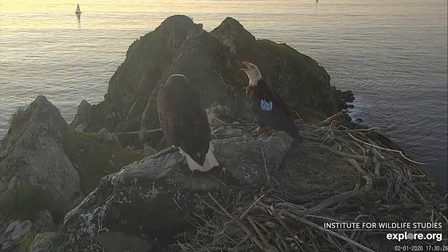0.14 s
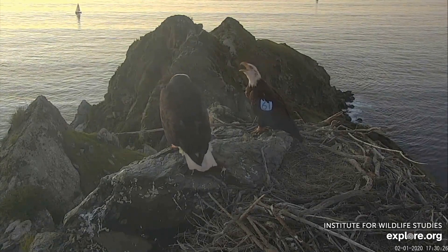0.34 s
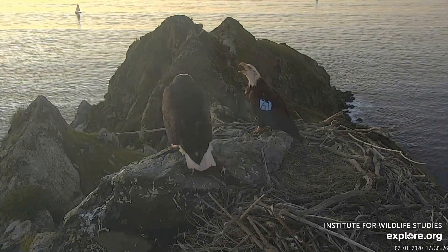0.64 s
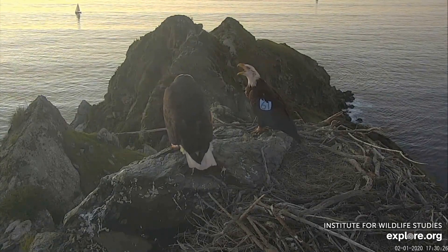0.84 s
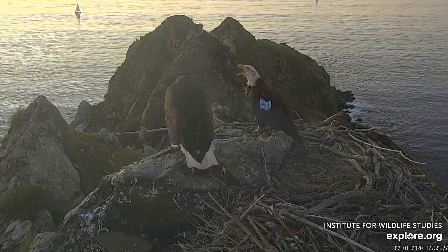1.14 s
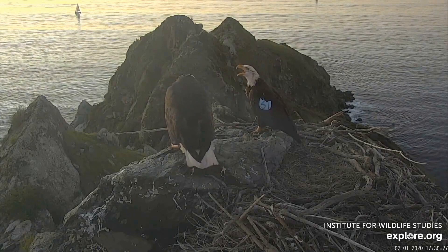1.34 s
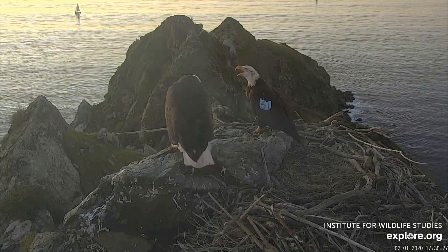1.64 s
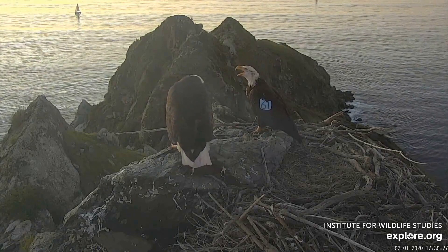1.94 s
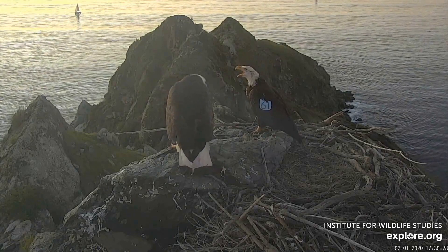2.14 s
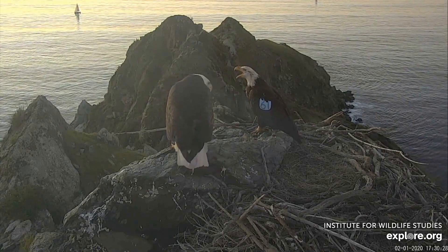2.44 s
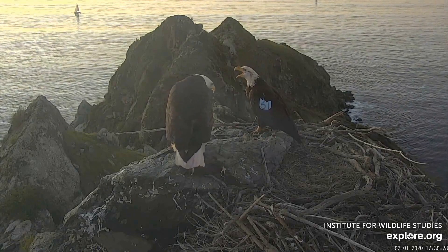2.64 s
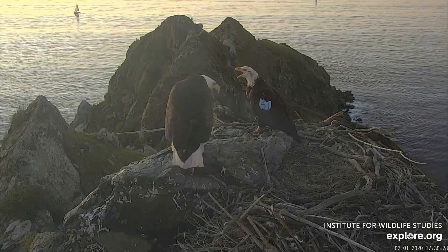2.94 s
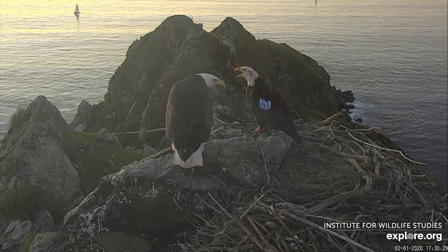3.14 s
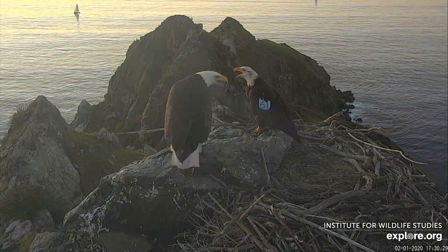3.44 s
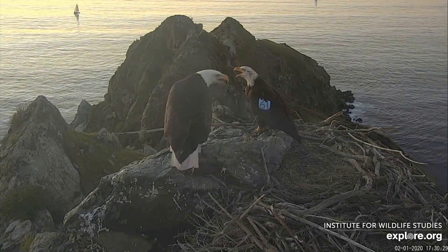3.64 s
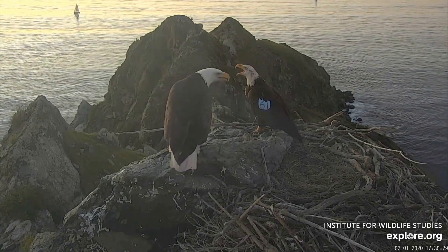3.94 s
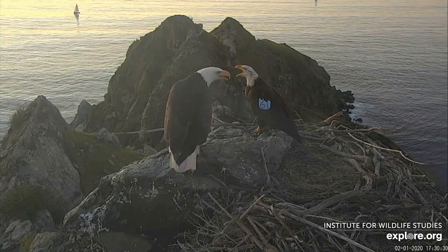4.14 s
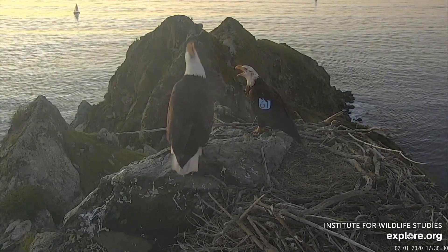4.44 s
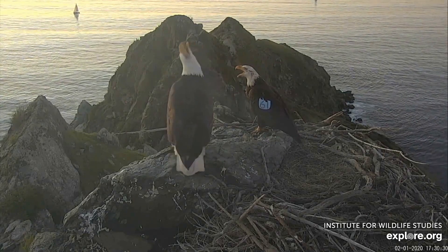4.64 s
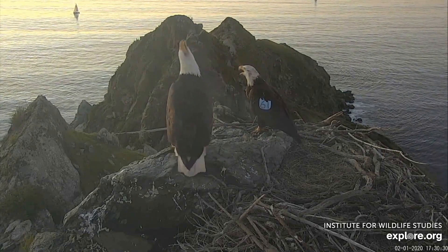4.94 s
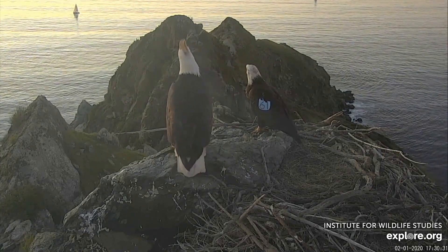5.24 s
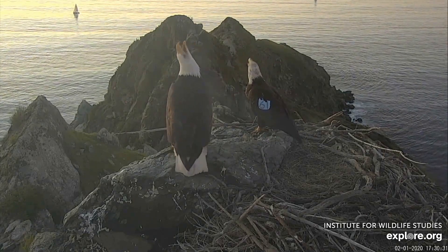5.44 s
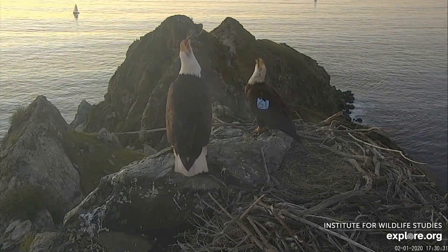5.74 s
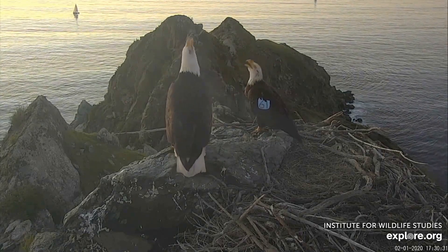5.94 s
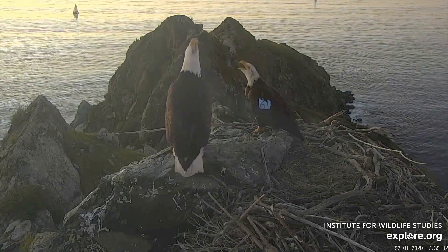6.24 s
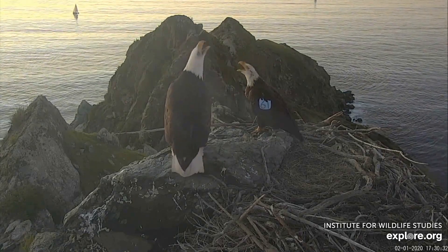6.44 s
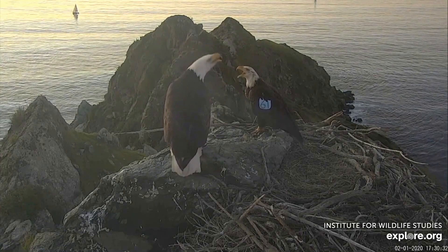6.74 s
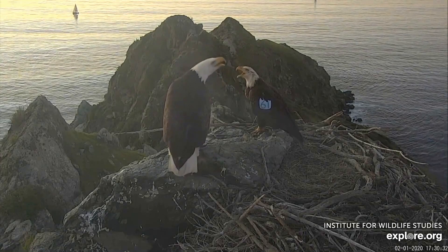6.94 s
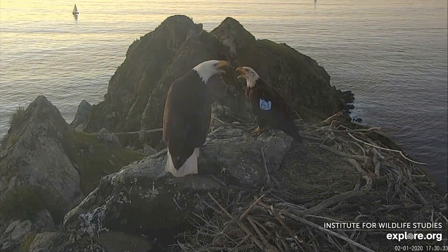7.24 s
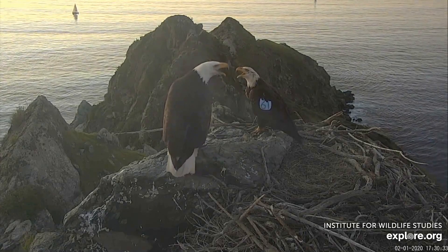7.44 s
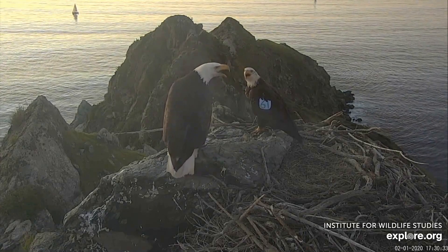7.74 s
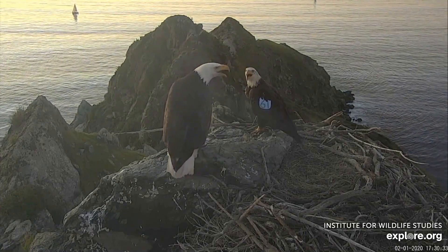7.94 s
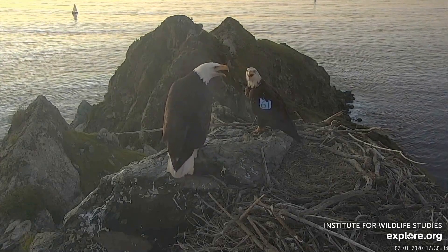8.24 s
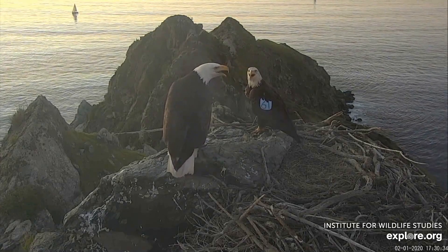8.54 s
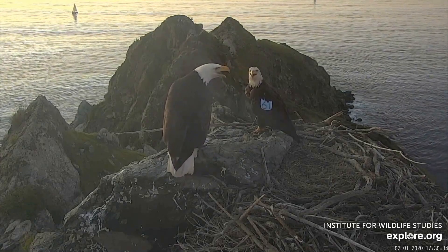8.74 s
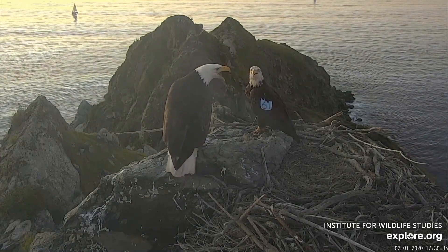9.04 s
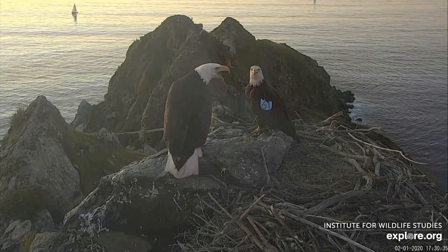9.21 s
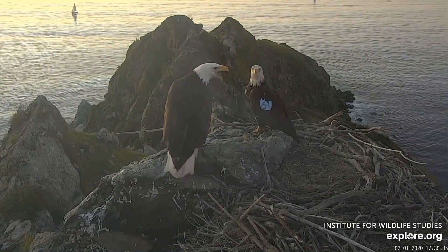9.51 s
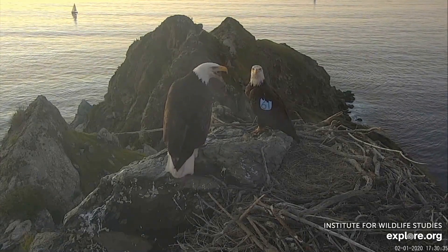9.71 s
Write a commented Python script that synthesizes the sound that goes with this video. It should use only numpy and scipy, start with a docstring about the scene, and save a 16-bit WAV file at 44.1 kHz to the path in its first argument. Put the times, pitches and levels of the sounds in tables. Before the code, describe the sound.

A loud, slightly overloaded eagle duet in the open air by the sea. One bird's very high piping answers the other's lower chitter, about eight notes a second, each a brief pure chirp with a raspy edge. There are small gaps, isolated yelping whistles in the middle, a couple of soft low mews and a nest thump later, then strong calls to the end. Quiet surf wash and wind rumble stay behind, nearly without echo.

```python
"""Two eagles chitter at each other on a cliff-top nest, close to a fixed camera microphone.
Each note is a nearly pure whistle, many led in by a quick falling squeak; the middle register rasps and warbles.
The loud notes overload the input, which adds shrill overtones; birds that overlap make combination tones.
Surf far below is filtered noise, with wind rumbling on the housing, a faint hum, bumps on the nest
and a faint scatter of the calls from the rocks."""
import sys
import numpy as np
from scipy import signal
from scipy.fft import rfft, irfft, next_fast_len
from scipy.io import wavfile
from scipy.ndimage import uniform_filter1d

SR = 44100
rng = np.random.default_rng(int(sys.argv[2]) if len(sys.argv) > 2 else 0)


def wav_out(sig):
    """Save sig, one row per channel (or a flat mono array), as 16-bit PCM at SR to the path in sys.argv[1]."""
    wavfile.write(sys.argv[1], SR, np.round(np.clip(np.atleast_2d(sig).T, -1, 1) * 32767).astype(np.int16))


N = 435266
T = np.arange(N) / SR

# arched chitter notes of both birds: [t/s, length/s, top f/Hz, relative level/dB, attack/s]
CHITTER_NOTES = [(0.04, 0.053, 3770, -20.5, 0.0074), (0.075, 0.035, 2970, -21, 0.0073),
                 (0.155, 0.065, 2933, -14.5, 0.0041), (0.274, 0.054, 2887, -8.5, 0.0084),
                 (0.398, 0.047, 2880, -9, 0.0047), (0.523, 0.044, 2810, -12, 0.0063),
                 (0.646, 0.042, 2755, -15, 0.0055), (0.781, 0.031, 2110, -26.5, 0.004),
                 (0.944, 0.087, 4600, -3.5, 0.0041), (1.09, 0.029, 4590, -5.5, 0.0054),
                 (1.15, 0.072, 4650, -7.5, 0.026), (1.244, 0.11, 2954, -8.5, 0.0084),
                 (1.252, 0.048, 3770, -12.5, 0.024), (1.286, 0.032, 4650, 0, 0.024),
                 (1.369, 0.055, 2868, -9, 0.0017), (1.37, 0.059, 3606, -4.5, 0.017),
                 (1.484, 0.052, 2830, -7.5, 0.0025), (1.485, 0.056, 3490, -8, 0.0053),
                 (1.585, 0.052, 2850, -3.5, 0.019), (1.694, 0.042, 2750, -14.5, 0.007),
                 (2.203, 0.083, 2917, -4, 0.011), (2.33, 0.051, 2914, -8.5, 0.0049),
                 (2.416, 0.091, 4520, -10, 0.023), (2.44, 0.054, 2855, -8.5, 0.0038),
                 (2.551, 0.053, 2807, -5.5, 0.017), (2.566, 0.037, 4560, -9, 0.007),
                 (2.629, 0.08, 4705, -11.5, 0.0093), (2.665, 0.046, 2786, -4.5, 0.012),
                 (2.744, 0.017, 3790, -10.5, 0.0051), (2.754, 0.057, 4610, -11, 0.0046),
                 (2.882, 0.046, 4450, -17, 0.002), (2.98, 0.051, 3610, -2, 0.019),
                 (3.073, 0.078, 2810, -5.5, 0.015), (3.104, 0.05, 3510, -10.5, 0.0056),
                 (3.206, 0.05, 2734, -7.5, 0.011), (3.346, 0.045, 2620, -10.5, 0.014),
                 (3.478, 0.055, 3355, -14.5, 0.011), (3.549, 0.042, 2465, -16, 0.0045),
                 (3.752, 0.044, 2437, -14.5, 0.003), (4.171, 0.099, 4600, -7, 0.013),
                 (4.342, 0.029, 4430, -9.5, 0.0039), (4.4, 0.075, 4700, -8.5, 0.028),
                 (4.528, 0.018, 3840, -4.5, 0.0055), (4.545, 0.05, 4580, -10.5, 0.002),
                 (4.647, 0.055, 3700, -5.5, 0.0071), (4.768, 0.065, 3530, -6.5, 0.015),
                 (4.905, 0.047, 3460, -9, 0.0055), (5.031, 0.036, 3330, -18, 0.0022),
                 (5.658, 0.033, 4260, -16, 0.012), (6.558, 0.087, 4456, -4.5, 0.02),
                 (6.722, 0.027, 4480, -3.5, 0.005), (6.822, 0.033, 4610, -2.5, 0.0088),
                 (6.941, 0.032, 4550, -7, 0.0046), (7.051, 0.036, 4490, -10.5, 0.0087),
                 (7.146, 0.064, 3597, -4, 0.0091), (7.281, 0.053, 3527, -5, 0.0065),
                 (7.36, 0.09, 2635, -5, 0.037), (7.504, 0.054, 2647, -6, 0.0056),
                 (7.63, 0.054, 2625, -6, 0.0083), (7.75, 0.037, 2490, -19.5, 0.006),
                 (7.957, 0.073, 3673, -4, 0.0078), (8.068, 0.067, 3694, -2.5, 0.017),
                 (8.187, 0.062, 3567, -3, 0.021), (8.34, 0.051, 2618, -4.5, 0.0033),
                 (8.513, 0.057, 2576, -3, 0.052), (8.52, 0.02, 3420, -8, 0.0017),
                 (8.737, 0.054, 2473, -6, 0.013), (9.221, 0.1, 2830, -0.5, 0.015),
                 (9.389, 0.05, 3416, -2, 0.018), (9.47, 0.073, 3505, -3.5, 0.024),
                 (9.606, 0.053, 2787, -3, 0.014), (9.603, 0.02, 3370, -3.5, 0.01),
                 (9.728, 0.059, 2752, -2.0, 0.01), (9.861, 0.066, 2830, -4, 0.006)]
# wails, whose pitch glides: [t/s, length/s, middle f/Hz, relative level/dB, attack/s, rise/share of pitch]
GLIDING_WAILS = [(2.861,0.05,3790,-7,0.0054,0.092), (4.29,0.017,4640,-10.5,0.00069,0.11),
                 (4.403,0.098,3077,-8,0.0064,-0.097), (4.501,0.043,3085,-7.5,0.019,.1),
                 (4.757,0.06,2977,-5,0.011,0.057), (4.825,0.081,3580,3.5,0.15,0.11),
                 (5.146,0.037,2473,-2.5,0.02,0.14), (5.169,0.042,3016,-2.5,0.0033,0.022),
                 (5.513,0.068,2990,0,0.019,0.077), (5.58,0.042,3643,-3,0.025,0.02),
                 (5.848,0.095,3028,-2,0.019,0.1), (6.195,0.053,2537,-9.5,0.016,0.2),
                 (6.227,0.047,3087,-8,0.0044,0.024), (6.572,0.062,2583,-12,0.01,0.2),
                 (6.615,0.056,3135,-9,0.0052,0.054), (6.669,0.021,4530,-11.5,0.004,0.17),
                 (6.901,0.036,3830,-5.5,0.0014,-0.018), (7.019,0.039,3746,1.5,0.02,0.09)]


def undb(db):
    """Decibels to gain."""
    return 10 ** (np.asarray(db) / 20)


def unit(x):
    """Scale to rms 1."""
    return x / np.sqrt(np.mean(x ** 2) + 1e-18)


def add(track, s, sound):
    """Mix a sound in at time s."""
    i = max(int(s * SR), 0)
    track[i:i + len(sound)] += sound[:max(N - i, 0)]


def colour(x, points):
    """Filter by (Hz, dB) points joined on a log-frequency axis."""
    hz, db = np.transpose(points)
    size = next_fast_len(N)
    f = np.fft.rfftfreq(size, 1 / SR) + 1  # the 1 Hz keeps the logarithm finite
    gain = undb(np.interp(np.log(f), np.log(hz), db))
    return irfft(rfft(x, size) * gain, size)[..., :N]


def band(x, hz, octaves):
    """Band-pass around hz."""
    edges = np.clip([hz * 2 ** (-octaves / 2), hz * 2 ** (octaves / 2)], 10, SR / 2 - 10)
    return signal.sosfilt(signal.butter(2, edges, "band", fs=SR, output="sos"), x)


def high_pass(x, hz, order):
    """Take out what lies below hz."""
    return signal.sosfilt(signal.butter(order, hz, "high", fs=SR, output="sos"), x)


def sine(hz):
    """A sine that follows a pitch curve."""
    return np.sin(2 * np.pi * np.cumsum(hz) / SR)


def walk(rate):
    """Smooth chance of spread 1 that changes about rate times a second."""
    k = max(int(SR / rate), 1)
    return unit(uniform_filter1d(uniform_filter1d(rng.standard_normal(N), k), k))


def span(s, length):
    """Sample indices of an event and its progress from 0 to 1."""
    count = max(int(length * SR), 8)
    return np.clip(int(s * SR) + np.arange(count), 0, N - 1), np.linspace(0, 1, count)


def puffs(table, octaves):
    """Short swells of noise in one resonance."""
    out, noise = np.zeros(N), rng.standard_normal(N)
    for s, length, hz, db in table:
        i, u = span(s, length)
        swell = np.sqrt(u) * (1 - u)
        add(out, s, undb(db) * unit(band(noise[i], hz, octaves) * swell))
    return out


def sea(surf_db=5, wind_db=-5, wind_hz=105, gust_db=3, wash_db=1):
    """Surf whose low roar and high wash swell separately, and gusts rumbling on the housing."""
    # slow course of the weather: [t/s, surf level/dB before surf_db, wind level/dB before wind_db]
    weather = [(0, -38, -47), (1.5, -39, -59), (4, -37, -74), (5.6, -39, -49), (7.2, -40.5, -37.5),
               (8.1, -41.5, -32.5), (8.6, -41.5, -44), (9.87, -40.5, -45)]
    # colour of the distant surf: [f/Hz, relative level/dB]
    surf_colour = [(29, -57), (50, -15), (81, -18), (107, -3.5), (140, -2), (200, -2), (690, -10.5),
                   (1060, -5), (2070, -23.5), (2450, -11), (2690, -16.5), (3030, -18), (4040, -24.5),
                   (5500, -39.5), (15000, -53.5)]
    s, *columns = np.transpose(weather)
    surf_level, wind_level = (np.interp(T, s, c) for c in columns)
    surf = unit(colour(rng.standard_normal(N), surf_colour))
    wash = band(surf, 2500, 5.1)
    roar = surf - wash
    surf = roar * undb(0.1 * walk(1.0)) + wash * undb(wash_db * walk(14.0))
    wind = unit(band(rng.standard_normal(N), wind_hz, 2.3)) * undb(gust_db * walk(3.4))
    return surf * undb(surf_level + surf_db) + wind * undb(wind_level + wind_db)


def hum(hz=113, db=-47):
    """A faint hum at the camera, wavering in pitch and level."""
    return undb(db + 2 * walk(1)) * sine(hz + 2 * walk(13.6))


def cliff(calls, t60_s=1.0, wet_db=-43):
    """Faint scatter from the rocks around the nest: a decaying noise tail, cut at half a second."""
    t = T[:SR // 2]
    tail = band(rng.standard_normal(len(t)), 3800, 0.45) * undb(-60 * t / t60_s)
    return undb(wet_db) * signal.fftconvolve(calls, tail / np.sqrt(np.sum(tail ** 2)))[:N]


def bumps():
    """Dull bumps on the nest, as brief noise in a mostly low resonance."""
    # [t/s, length/s, centre f/Hz, rms level/dB]
    knocks = [(5.972, 0.0038, 1080, -21), (8.02, 0.032, 115, -31), (8.105, 0.046, 124, -17.5),
              (8.11, 0.033, 220, -36)]
    return puffs(knocks, octaves=0.87)


def rattle(ring_hz=3200, decay_s=0.00058, scatter=0.15):
    """A short dry rattle: single slow pulses, each ringing the throat unevenly for a moment."""
    # [t/s, relative level/dB]
    pulses = [(5.7758, -5), (5.7884, -10), (5.8003, -5.5), (5.8112, -17), (5.822, -18), (5.8365, -20)]
    out, t, shake = np.zeros(N), T[:SR // 100], walk(3000)
    for s, db in pulses:
        hz = ring_hz * (1 + scatter * shake[int(s * SR):][:len(t)])
        ring = t / decay_s * np.exp(1 - t / decay_s)
        add(out, s, undb(db) * ring * sine(hz))
    return out


def hisses():
    """Broad rasping hisses where the voice breaks up altogether into noise."""
    # [t/s, length/s, centre f/Hz, rms level/dB]
    breaks = [(1.262, 0.033, 3800, -25), (2.322, 0.02, 3350, -20), (2.661, 0.0066, 3700, -20),
              (5.225, 0.047, 3580, -32.5), (5.752, 0.066, 3830, -29.5), (6.779, 0.0037, 3330, -21.5),
              (7.402, .024, 3560, -21), (7.433, 0.021, 3700, -30.5), (7.63, 0.0082, 3100, -29),
              (9.357, 0.032, 3800, -30)]
    return puffs(breaks, octaves=0.35)


def husks(scratch_db=-13, scratch_ratio=1.39):
    """The whistle fails to lock: a weak tone that skips about its pitch, under a thin scratch when high."""
    # husky stretches: [t/s, length/s, centre f/Hz, relative level/dB]
    stretches = [(0.882, 0.058, 4100, -27), (1.036, 0.051, 4500, -23), (2.511, 0.066, 4650, -25.5),
                 (5.186, 0.045, 3300, -23.5), (6.243, 0.072, 3310, -20.5), (6.653, 0.11, 4700, -31.5),
                 (6.775, 0.052, 4660, -20.5)]
    out, skip, flicker, sweep = np.zeros(N), walk(1500), walk(300), walk(400)
    for s, length, hz, db in stretches:
        i, u = span(s, length)
        tone = sine(hz * (1 + .04 * skip[i]))
        drift = 1 + .09 * sweep[i] + .04 * skip[i]
        high = hz > 4000
        scratch = high * undb(scratch_db) * sine(hz * scratch_ratio * drift)
        add(out, s, undb(db + 2 * flicker[i]) * np.sqrt(4 * u * (1 - u)) * (tone + scratch))
    return out


def squeaks(fall_s=.016, scratch=0.06, grain_db=3):
    """Scratchy, grainy chirps as the throat opens, falling by a third, each at its own speed."""
    # [t/s, starting f/Hz, relative level/dB]
    chirps = [(.026, 5000, -23.5), (0.141, 4840, -28), (0.263, 4630, -32.5), (0.383, 4430, -31),
              (0.517, 4170, -24.5), (1.146, 5350, -18.5), (1.255, 5500, -27), (1.357, 5000, -20.5),
              (1.371, 5240, -30), (1.468, 4660, -23), (2.311, 5200, -22), (2.417, 4630, -18),
              (2.626, 5800, -26), (2.737, 5200, -23), (2.855, 5400, -22), (2.972, 4960, -20.5),
              (3.194, 4460, -24), (3.463, 4300, -25), (4.639, 5120, -19), (6.775, 5900, -26),
              (6.895, 5600, -19.5), (7.013, 5340, -18), (7.14, 5300, -18), (7.273, 4800, -20.5),
              (7.493, 4370, -22), (7.624, 3880, -27), (7.949, 5000, -15.5), (8.064, 5000, -15.5),
              (8.181, 5000, -17.5), (8.328, 4400, -15), (9.348, 5400, -24.5), (9.386, 4500, -22),
              (9.465, 5260, -27), (9.589, 4800, -24.5), (9.716, 4750, -21), (9.847, 4660, -19)]
    out, shake, grain = np.zeros(N), walk(3000), walk(700)
    for (s, top_hz, db), speed in zip(chirps, rng.standard_normal(len(chirps))):
        i, u = span(s, fall_s * np.exp(.15 * speed))
        glide = top_hz * (1 - .33 * u) * (1 + scratch * shake[i])
        add(out, s, undb(db + grain_db * grain[i]) * np.sin(np.pi * u) * sine(glide))
    return out


def overlap(blend_s=.012):
    """1 while two notes sound together, else 0, with a short blend between."""
    voices = np.zeros(N)
    for s, length, *_ in CHITTER_NOTES + GLIDING_WAILS:
        voices[span(s, length)[0]] += 1
    return uniform_filter1d(1. * (voices > 1), int(blend_s * SR))


def burr(voices, hz=630, octaves=0.59, db=-4, under_hz=2080, under_db=-3):
    """Two notes at once beat: a low difference tone, and a side tone under the lower note."""
    difference = undb(db) * band(voices ** 2, hz, octaves)
    side_tone = undb(under_db) * band(-voices ** 3, under_hz, octaves / 2)
    return overlap() * (difference + side_tone)


def tearing(voices, hz=3700, octaves=.9, db=-26):
    """Two clashing tones tear the air stream, which fills the gaps between them with noise."""
    pressure = np.sqrt(np.abs(uniform_filter1d(voices ** 2, SR // 500)))
    return undb(db) * overlap() * pressure * unit(band(rng.standard_normal(N), hz, octaves))


def register(hz):
    """Fall time, droop, release and second harmonic of the voice at this pitch."""
    # low, middle and high register: [f/Hz, time from the top of the arch to the end of a 60 ms note/s,
    # pitch lost in that time/share, longest release/s, second harmonic/dB before any overtone boost]
    voice_registers = [(2710, .036, 0.08, 0.025, -31.5), (3590, .036, .09, 0.024, -25.5),
                       (4550, .043, 0.12, 0.024, -87)]
    pitches, *columns = np.transpose(voice_registers)
    return [np.interp(hz, pitches, c) for c in columns]


def arch(u, length, hz):
    """Pitch tops out and sags as the pressure runs out; a short note is only the falling side."""
    fall_s, droop, *_ = register(hz)
    fall_s = fall_s * (length / .06) ** 0.53  # longer notes take longer to fall
    return hz * (1 - droop * (1 - (1 - u) * length / fall_s) ** 2)


def climb(u, length, hz, rise, bow=0.077):
    """Pitch glides up, or down where rise is negative, along a slight bow."""
    return hz * (1 + rise * (u - .5) - bow * (u - .5) ** 2)


def whistles(table, contour, half_db=-36, overtone_db=0, third_db=-80, turbulence=0.0078, hoarse=0.075):
    """Whistles on a pitch contour; near the register break they warble, and start with a quarter-pitch rasp."""
    out, shake, tremor, grit, air = np.zeros(N), walk(2500), walk(230), walk(430), walk(7000)
    warble, warble_hz, warble_s = .03, 53, .035
    rasp, rasp_s, jitter, clash_rough = .75, .026, .0018, .14
    soft_attack_s, tremor_db = .017, 1.3
    clash = overlap() * walk(1800)
    for s, length, pitch, db, attack_s, *rise in table:
        i, u = span(s, length)
        t = u * length
        *_, release_s, second_db = register(pitch)
        unstable = np.exp(-((pitch - 3570) / 300) ** 2)  # near the register break
        slack = np.exp(-((pitch - 2550) / 130) ** 2)

        # the low, slack notes quaver too; all settle as they go on
        depth = warble * (.15 + unstable + .8 * slack) * np.exp(-(t / warble_s) ** 2)
        flutter = -depth * np.cos(2 * np.pi * warble_hz * t)
        # only a note that starts abruptly is rough at first
        onset = np.exp(-(t / rasp_s) ** 2) / (1 + (attack_s / soft_attack_s) ** 6)
        unsteady = jitter * (1 + 8 * onset * (.2 + unstable + slack)) * shake[i]
        hz = contour(u, length, pitch, *rise) * (1 + flutter + .002 * tremor[i] + unsteady)
        phase = 2 * np.pi * np.cumsum(hz) / SR

        # in low notes alternate cycles differ slightly; in the rasp the pattern repeats every fourth cycle
        doubling = undb(half_db) * (pitch < 3000) * (1 + 4 * slack * onset) * 2 * np.cos(phase / 2)
        quarter = rasp * unstable * onset * np.cos(phase / 4 + .25 * grit[i])
        # long and short cycles go with the strong and weak ones
        phase = phase + .9 * quarter + doubling / 2
        # turbulent air roughens every note, and clashing notes most
        phase = phase + turbulence * (1 + 2 * onset) * air[i] + clash_rough * clash[i]

        # the release takes at most 63 % of a short note
        release = np.minimum((1 - u) / min(release_s / length, 0.63), 1) ** 1.255
        pressure = np.minimum(t / attack_s, 1) * release
        second = undb(second_db + overtone_db) * np.cos(2 * phase)
        voice = np.sin(phase) + second + undb(third_db) * np.sin(3 * phase)
        level = undb(db + tremor_db * (1.34 + onset) * tremor[i])
        roughness = 1 + doubling + quarter / 2 + hoarse * onset * shake[i]
        add(out, s, level * pressure * roughness * voice)
    return out


def mews():
    """Soft low mews, arched like the notes but richer in overtones and breathier."""
    # [t/s, length/s, top f/Hz, relative level/dB, attack/s]
    soft_notes = [(5.275, 0.046, 1434, -28, 0.023), (7.77, 0.021, 1210, -15, 0.027),
                  (7.838, 0.055, 1464, -17.5, 0.063)]
    return whistles(soft_notes, arch, overtone_db=29, third_db=-10, turbulence=.08)


def scene(width_db=-25):
    """Everything reaches one microphone, which feeds both channels; only the sea is slightly wide."""
    voices = whistles(CHITTER_NOTES, arch) + whistles(GLIDING_WAILS, climb)
    calls = voices + burr(voices) + tearing(voices) + mews()
    calls = calls + squeaks() + husks() + hisses() + rattle()
    sound = calls + cliff(calls) + bumps() + sea() + hum()
    side = undb(width_db) * sea()
    return np.array([sound + side, sound - side])


def record(dry, squeeze=0.36, follow_s=0.0086, gain_db=0.5, low_cut_hz=60, side_db=-24.5, side_hz=700,
           hiss_db=-84):
    """The input stage clips unevenly; then microphone colour, gain control, hiss and the top cut."""
    # [f/Hz, gain/dB]
    microphone = [(2800, 2), (3600, 1.5), (4500, 2), (5600, 1.5), (8800, 10), (10700, 15), (12200, 11.5),
                  (14000, 10), (15500, 18)]
    ceiling, offset, top_hz = 0.5, .11, 15500
    fine = signal.resample_poly(dry.mean(axis=0), 6, 1)  # oversampled, so that clipping does not alias
    # the offset adds even overtones, a small thump per note, and the difference tone of two birds
    fine = ceiling * (np.tanh(fine / ceiling + offset) - np.tanh(offset))
    sound = colour(signal.resample_poly(fine, 1, 6)[:N], microphone)
    sound = high_pass(sound, low_cut_hz, order=2)

    # the gain gives way as the smoothed loudness grows
    keep = np.exp(-1 / (follow_s * SR))
    loudness = signal.lfilter([1 - keep], [1, -keep], np.abs(sound))
    sound = sound * undb(gain_db) / (1 + squeeze * loudness)

    # the right channel is a little brighter than the left
    side = undb(side_db) * high_pass(sound, side_hz, order=1) + (dry[1] - dry[0]) / 2
    pair = np.array([sound - side, sound + side]) + undb(hiss_db) * rng.standard_normal((2, N))
    return signal.sosfilt(signal.ellip(10, .2, 80, top_hz, fs=SR, output="sos"), pair)


dry = scene()
out = record(dry)
wav_out(out)
```